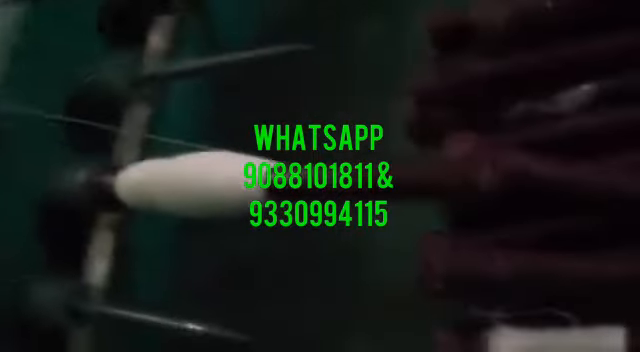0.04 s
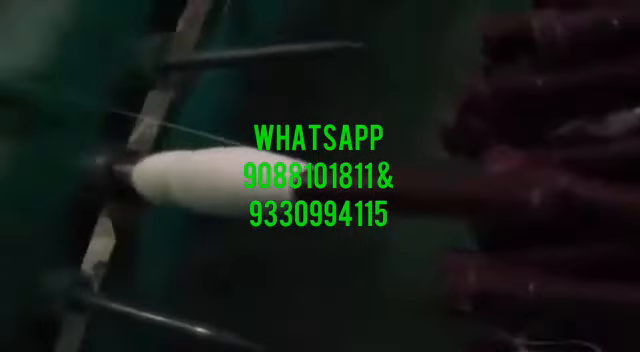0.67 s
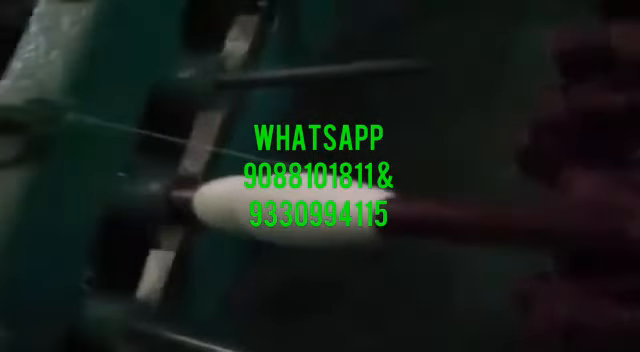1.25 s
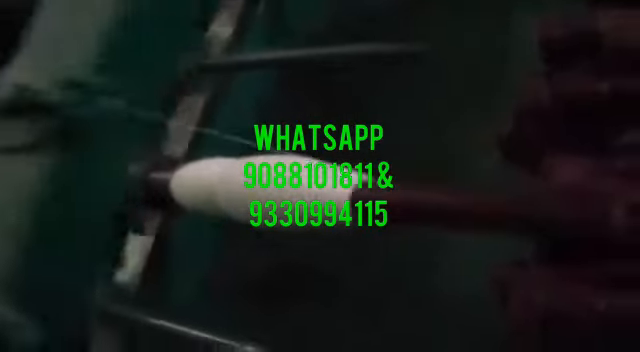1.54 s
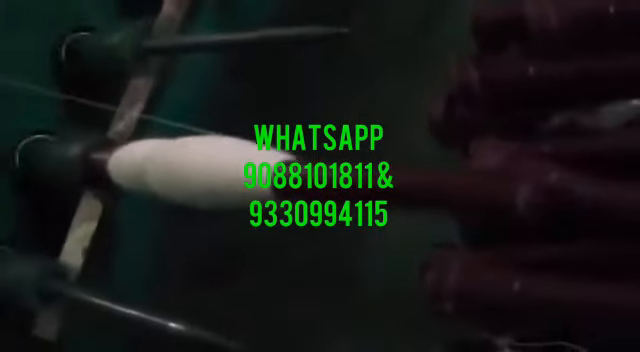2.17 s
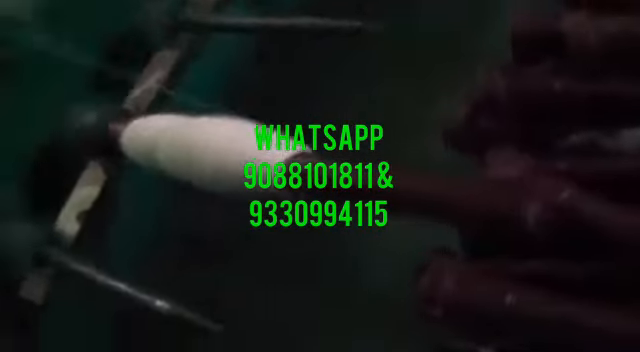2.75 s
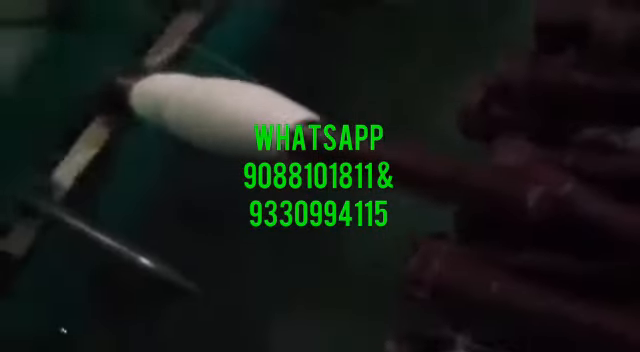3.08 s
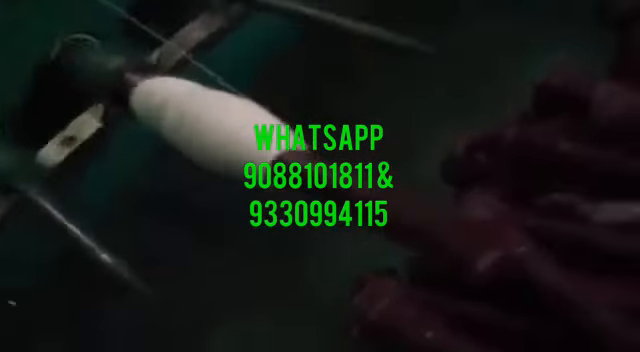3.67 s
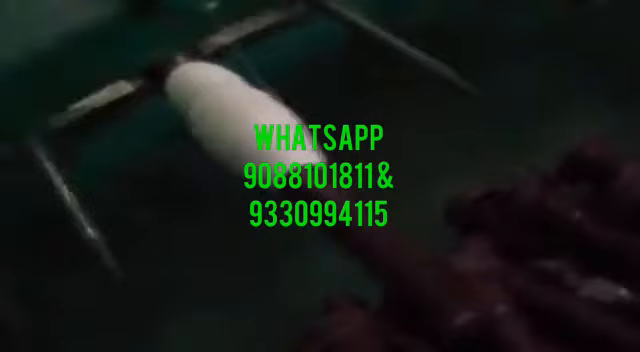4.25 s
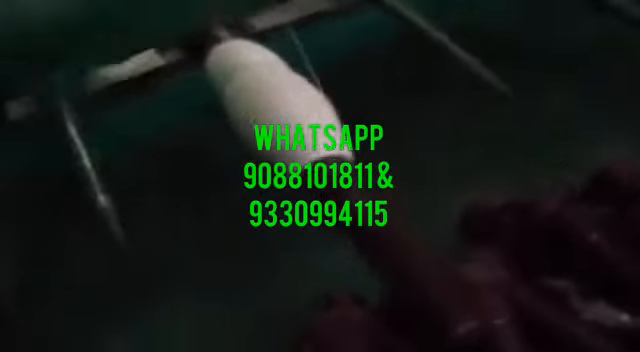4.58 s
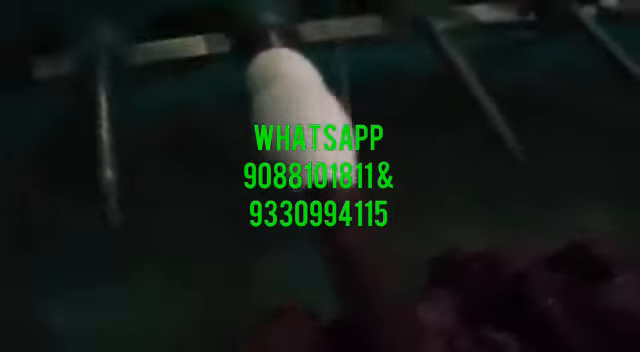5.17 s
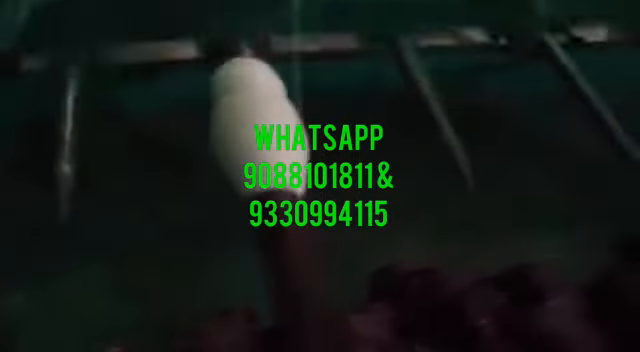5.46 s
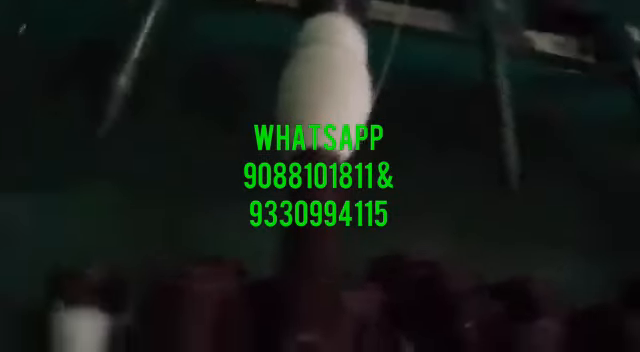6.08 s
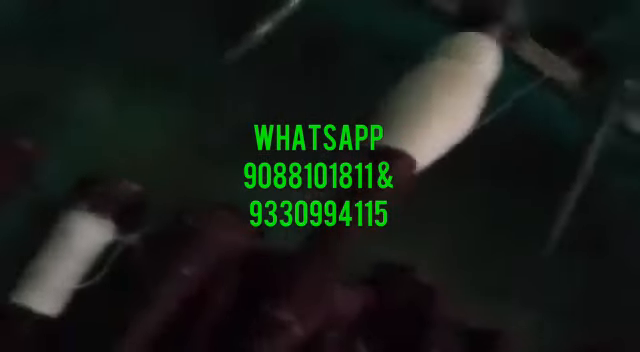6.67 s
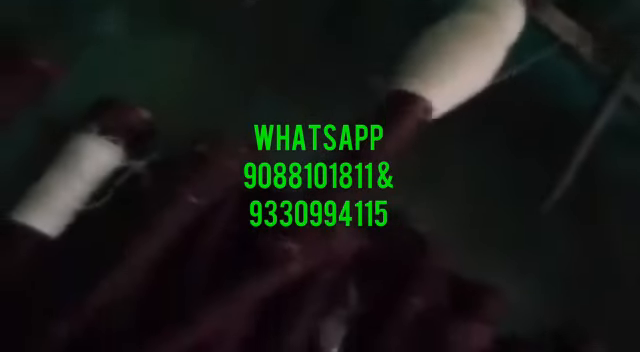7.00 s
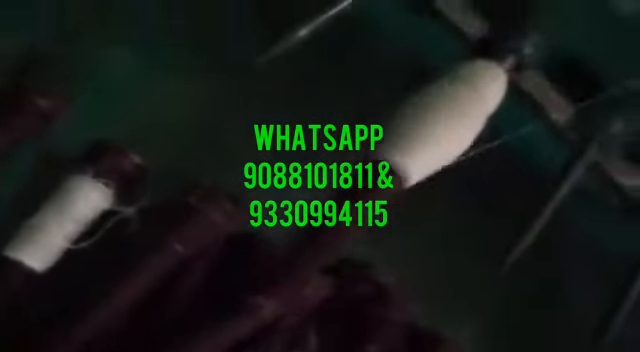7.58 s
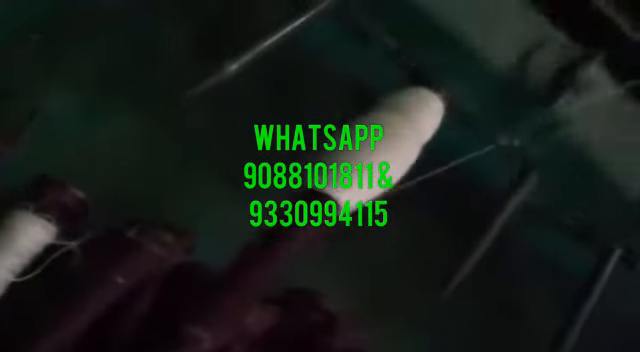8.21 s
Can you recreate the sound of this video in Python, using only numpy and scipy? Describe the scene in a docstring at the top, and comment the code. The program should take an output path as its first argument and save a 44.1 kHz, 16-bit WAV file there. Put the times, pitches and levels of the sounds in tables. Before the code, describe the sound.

Steady factory machine noise of belts, gears and loose spindles, marked by regular sharp metal clacks and a few faint squeaks.

```python
"""A bobbin winder runs close by: from the start, belts and gears roar, its frame rumbles and
loose spindles rattle and knock. Soon the yarn guide rail clacks against a stop, then shuttles to
and fro, clacking at each end. After most clacks the whole din ducks briefly, as under a limiter,
then recovers and builds through the stroke. Now and then a dry guide squeaks or the drive grinds
louder for a moment. The hardest clack comes just before the end."""
import sys
import numpy as np
from scipy import signal
from scipy.fft import rfft, irfft, next_fast_len
from scipy.io import wavfile
from scipy.ndimage import uniform_filter1d, minimum_filter1d

SR = 44100
rng = np.random.default_rng(int(sys.argv[2]) if len(sys.argv) > 2 else 0)


def waveform_to_disk(signal):
    """Save audio, clipped to [-1, 1], as 16-bit WAV at the path in sys.argv[1]."""
    frames = np.transpose(np.atleast_2d(signal))
    scaled = np.clip(frames, -1, 1) * 32767
    samples = np.round(scaled).astype(np.int16)
    wavfile.write(sys.argv[1], SR, samples)


N = 367794
TIME = np.arange(N) / SR

# tone of the belts and gears (frequency [Hz], relative level [dB])
ROAR_TONE = [(65, -32), (110, -2.5), (140, -8.5), (231, -5), (326, -6), (504, -5.5), (665, -1.5), (964, 1),
             (1180, 0), (2000, -7.5), (2600, -17), (3380, -36), (5720, -120)]
# low notes the frame rings at (frequency [Hz], width [Hz], relative level [dB])
FRAME_NOTES = [(20.8, 3.1, -3), (27, 3.7, -5), (37, 2.4, -8), (48.9, 6, 5), (71.5, 1, -0.5),
               (79.4, 2.1, -3.5), (97.7, 5.6, -1), (107, 12, -6.5), (123.5, 15, -3.5), (165.4, 2.1, -7),
               (182, 7.7, -18.5), (228.7, 2.7, -15.5), (274.8, 3.2, -13)]
# the frame's rumble before ducking and surges (time [s], level [dB])
RUMBLE_LEVELS = [(0, -24), (.4, -30.5), (.78, -26), (1.0, -26.5), (1.6, -31), (2.0, -25.5), (2.5, -29.5),
                 (2.85, -26), (3.1, -28.5), (4.4, -30), (5.35, -27.5), (5.6, -23.5), (6.05, -34.5),
                 (6.35, -24), (6.9, -31), (7.4, -27.5), (8.34, -27.5)]
# tone of the spindles' rattle (frequency [Hz], relative level [dB])
RATTLE_TONE = [(700, -43), (1300, 4.5), (1900, 4), (2300, 0), (2600, -4), (3600, 0), (4000, -7.5),
               (4500, -6), (5100, -6), (5600, -17)]
# notes the spindles and guides ring at (frequency [Hz], width [Hz], relative level [dB])
SPINDLE_NOTES = [(710, 90, -7.5), (952, 72, -2.5), (1020, 39, -8.5), (1244, 63, 0.5), (1478, 12, -3.5),
                 (1646, 130, -9.5), (2240, 220, -5.5), (3036, 11, -13.5), (3480, 18, -16.5), (3650, 25, -5),
                 (4850, 280, -8), (5050, 98, -21)]
# loose parts knock (time [s], relative level [dB])
LOOSE_KNOCKS = [(0.079, -14), (0.152, -14.5), (0.517, -13.5), (1.390, -13.5), (1.459, -12.5),
                (1.548, -15.5), (2.257, -18.5), (2.415, -13), (2.430, -12.5), (2.834, -17.5), (3.28, -18.5),
                (3.337, -13), (3.519, -16.5), (3.577, -11.5), (3.759, -17.5), (4.013, -11.5),
                (4.176, -15.5), (4.206, -16), (4.446, -14), (4.468, -15), (4.864, -19.5), (4.896, -13),
                (5.132, -14.5), (5.771, -12), (5.957, -12), (6.212, -13), (6.633, -15), (6.776, -20),
                (6.864, -16.5), (6.922, -15.5), (7.432, -15.5), (7.497, -14), (7.821, -11), (8.252, -20.5),
                (8.319, -12)]
# the rail hits the near or the far stop; a duck below zero is a lift (time [s], relative level [dB],
# chatter length [s], buzz against the blow [dB], duck that follows [dB], next stroke's offset [dB])
NEAR_HITS = [(.401, -8, .008, -14.5, 3.5, 0.1), (1.319, 1.5, 0.0068, -18, 2.5, 0),
             (2.226, -6.5, .008, -9, 3.2, -0.5), (3.135, 2, 0.0039, -17.5, 2.5, -2),
             (4.029, -8.5, 0.0072, -9.5, 0.4, -2.7), (4.930, -8.5, 0.0078, -20, 6.5, 1.2),
             (5.821, -8, .0044, -12.5, 0.8, -2), (6.727, -6, 0.0039, -17.5, -0.3, -1),
             (7.629, -8, 0.0025, -17.5, 4.5, 0.5)]
FAR_HITS = [(.858, -4.5, .004, -24.5, 5.5, 0.6), (1.778, 4, 0.0023, -26, 2.5, 0),
            (2.684, -3, .004, -15.5, -0.9, .2), (3.589, -9, 0.0096, -24.5, 5.5, 0.45),
            (4.480, -7.5, .0055, -23.5, 4.5, 1.1), (5.387, -6, .0086, -31, 3, 1),
            (6.287, 3.5, 0.0018, -24.5, 4, 1.3), (7.191, 3, 0.0025, -18, -3, -0.5),
            (8.097, 10.5, 0.0021, -26, -1.5, 0.9)]
# tone of the crack of each hit (frequency [Hz], relative level [dB])
CRACK_TONE = [(200, -15.5), (800, -4), (1500, 2.5), (2300, 7.5), (3500, 5), (4000, -3.5), (5000, -1),
              (5800, -9.5)]
# notes each stop rings at (frequency [Hz], width [Hz], relative level [dB])
NEAR_NOTES = [(594, 92, -15), (1540, 170, -2.5), (1922, 65, -7.5), (2082, 92, -5.5), (2516, 160, -8)]
FAR_NOTES = [(1542, 38, -13.5), (2180, 130, -10), (2900, 270, -9.5), (3470, 130, -18)]
# dry guides squeak (middle time [s], length [s], pitch [Hz], level [dB])
GUIDE_SQUEAKS = [(0.78, 0.13, 3300, -31), (1.12, 0.034, 3070, -21), (2.935, 0.062, 3100, -26.5),
                 (3.06, 0.049, 3130, -22.5), (4.404, 0.081, 3300, -23), (8.08, .07, 3270, -20)]
# the drive grinds louder for a moment (middle time [s], length [s], rise of the roar [dB])
DRIVE_SURGES = [(1.07, .04, 2.5), (1.246, 0.049, 3), (2.418, 0.033, 4), (3.324, 0.05, 3),
                (3.854, 0.11, 3.5), (4.164, .04, 4.5), (4.406, 0.11, 4.5), (4.689, 0.032, 0),
                (5.304, 0.11, 0.5), (5.664, 0.044, 3), (5.763, .04, 2.5), (6.216, 0.034, 4),
                (7.164, 0.066, 3), (7.404, 0.056, 4), (7.484, .04, 7.5), (7.826, 0.02, -0.5),
                (7.967, 0.034, 4)]


def from_db(db):
    """Turn decibels into a number to multiply by."""
    return 10 ** (np.asarray(db) / 20)


def unit_power(x):
    """Scale a signal to an average power of 1."""
    return x / np.sqrt(np.mean(x ** 2) + 1e-20)


def drift(per_s):
    """A random wander of typical size 1, heading for a new value per_s times a second."""
    turns = np.arange(0, TIME[-1] + 1, 1 / per_s)
    return unit_power(np.interp(TIME, turns, rng.standard_normal(N)[:len(turns)]))


def swell(middle, length):
    """A smooth rise and fall of height 1."""
    return np.exp(-(2 * (TIME - middle) / length) ** 2)


def colour(x, tone):
    """Filter a sound to the given tone; white noise keeps its power."""
    size = next_fast_len(N + SR // 10) * 2
    hz, db = np.transpose(tone)
    bin_hz = np.arange(size // 2 + 1) * SR / size
    gain = unit_power(from_db(np.interp(np.log(bin_hz + 1), np.log(hz), db, left=-60, right=-60)))
    # keep one half and double it, so the filter never sounds ahead of a blow
    cepstrum = irfft(np.log(gain))[:size // 2]
    cepstrum[1:] *= 2
    return irfft(rfft(x, size) * np.exp(rfft(cepstrum, size)))[:N]


def resonate(x, notes):
    """A shaken part rings at several notes at once; narrower notes ring longer."""
    out = 0
    for k, (hz, width_hz, db) in enumerate(notes):
        decay = np.exp(-np.pi * width_hz / SR)
        poles = [1, -2 * decay * np.cos(2 * np.pi * hz / SR), decay ** 2]
        gain = (-1) ** k * from_db(db) * np.sqrt((1 - decay ** 2) / 2)
        out = out + gain * signal.lfilter([1, 0, -1], poles, x + 1e-18)
    return out


def roar(level_db, flutter_db):
    """Belts and gears across the workshop merge into a fluttering roar."""
    return from_db(level_db + flutter_db * drift(60)) * colour(rng.standard_normal(N), ROAR_TONE)


def frame(level_db):
    """The turning shafts shake the frame, which rumbles at its low notes."""
    return from_db(level_db) * unit_power(resonate(rng.standard_normal(N), FRAME_NOTES))


def spindles(level_db, taps_per_s, spread_db, tap_s, whirr, ring_db, swell_db):
    """Loose spindles tap densely in their bearings over a steady whirr; at times one knocks harder."""
    is_tap = rng.random(N) < taps_per_s / SR
    taps = is_tap * from_db(spread_db * np.clip(rng.standard_normal(N), -2, 2))
    energy = signal.lfilter([1], [1, -np.exp(-2 / (tap_s * SR))], taps ** 2 + 1e-18)  # each tap fades
    loudness = np.sqrt(energy / energy.mean() + whirr)
    force = from_db(level_db) * unit_power(loudness * rng.standard_normal(N))
    knocks = sum(contact(s, db, .002, fade_s=.004, buzz_db=-12, buzz_s=.02) for s, db in LOOSE_KNOCKS)
    force += knocks.sum(axis=0)
    # each spindle rings up and falls quiet again in its own time
    rings = sum(resonate(force * from_db(swell_db * drift(12)), [note]) for note in SPINDLE_NOTES)
    return colour(force, RATTLE_TONE) + from_db(ring_db) * rings


def contact(start, db, chatter_s, fade_s, buzz_db, buzz_s):
    """Steel chatters on steel for a few milliseconds; returns the blow and its lingering buzz."""
    out, first = np.zeros((2, N)), int(start * SR)
    age = TIME[:min(SR // 4, N - first)]
    blow = np.exp(-np.maximum(age - chatter_s, 0) / fade_s)
    buzz = from_db(buzz_db) * np.exp(-age / buzz_s)
    shapes = np.array([blow, buzz])
    out[:, first:first + len(age)] = from_db(db) * shapes * rng.standard_normal(shapes.shape)
    return out


def rail_stop(hits, notes, crack_db, ring_db, hiss_db):
    """The rail hits a stop with a crack, then buzzes on at that stop's notes."""
    blow, buzz = sum(contact(s, db, chatter_s, fade_s=.002, buzz_db=buzz_db, buzz_s=.07)
                     for s, db, chatter_s, buzz_db, *_ in hits)
    crack = colour(blow + from_db(hiss_db) * buzz, CRACK_TONE)
    ring = resonate(blow + buzz, notes)
    return from_db(crack_db) * crack + from_db(ring_db) * ring


def strokes(duck_s, recover_s, climb_db_per_s):
    """After most hits the din ducks and swells back, as under a recorder's gain control."""
    duck_db, build_db, coasting = np.zeros((3, N))
    for s, *_, depth_db, offset_db in sorted(NEAR_HITS + FAR_HITS, key=lambda hit: hit[0]):
        first = int(s * SR)
        age = TIME[:N - first]
        duck_db[first:] = -depth_db * np.clip(1 - (age - duck_s) / recover_s, 0, 1)
        build_db[first:] = offset_db + climb_db_per_s * np.maximum(age - duck_s - recover_s, 0)
        coasting += swell(middle=s + .325, length=.14)  # 0 to 1, late in the stroke
    return uniform_filter1d([duck_db, build_db, coasting], size=SR // 50)


def squeaks(waver_hz):
    """A dry guide sings briefly on one slightly unsteady note."""
    waver = np.cumsum(waver_hz * drift(170)) / SR
    return sum(from_db(db) * swell(s, length) * np.sin(2 * np.pi * (hz * TIME + waver))
               for s, length, hz, db in GUIDE_SQUEAKS)


def surges(dip_share, wander_db):
    """Level change in dB: the drive grinds louder, then the level dips, over a slight wander."""
    change_db = wander_db * drift(35)
    for s, length, db in DRIVE_SURGES:
        dip = swell(middle=s + length / 2 + .06, length=.092)
        change_db += db * (swell(s, length) - dip_share * dip)
    return change_db


def scene():
    """The winder and workshop in mono; roar, rattle and rumble each follow the strokes and surges."""
    duck_db, build_db, coasting = strokes(duck_s=.089, recover_s=.096, climb_db_per_s=5)
    surge_db = surges(dip_share=.4, wander_db=.85)
    roar_db = -22 + .92 * duck_db + .9 * build_db + .1 * coasting + surge_db
    rumble_db = np.interp(TIME, *np.transpose(RUMBLE_LEVELS)) + .83 * duck_db + .5 * surge_db
    # the spindles settle while the rail coasts
    rattle_db = -21 + .55 * duck_db + .8 * build_db - 2.5 * coasting + .6 * surge_db
    rattle = spindles(rattle_db, taps_per_s=160, spread_db=3.5, tap_s=.017,
                      whirr=.8, ring_db=-11, swell_db=2.5)
    rumble = frame(rumble_db)
    near = rail_stop(NEAR_HITS, NEAR_NOTES, crack_db=-2.5, ring_db=1, hiss_db=.5)
    far = rail_stop(FAR_HITS, FAR_NOTES, crack_db=-.5, ring_db=-3, hiss_db=1)
    return (roar(roar_db, flutter_db=1.07) + rumble + rattle + near + far + squeaks(waver_hz=28))[None]


def limiter(x, threshold_db, share, release_db_per_s):
    """A loud peak turns the volume down at once by a share of its excess; the volume then creeps back."""
    peak_db = 20 * np.log10(np.abs(x).max(axis=0) + 1e-9)
    cut_db = share * np.maximum(peak_db - threshold_db, 0)
    release_db = release_db_per_s * TIME
    held_db = np.maximum.accumulate(cut_db + release_db) - release_db
    return x * from_db(uniform_filter1d(minimum_filter1d(-held_db, size=45), size=45))


def overload(x, threshold_db, range_db):
    """How hard the input is overdriven, from 0 to 1, over a few milliseconds."""
    level_db = 10 * np.log10(np.abs(uniform_filter1d(x ** 2, size=SR // 120)) + 1e-12)
    return np.clip((level_db - threshold_db) / range_db, 0, 1)


def record(dry):
    """Peaks are limited and rounded off and the treble is cut; the hardest clacks still spit treble."""
    limited = limiter(dry, threshold_db=-2, share=.34, release_db_per_s=53)
    squashed = limited / (1 + (limited / .66) ** 4) ** (1 / 4)
    dulled = signal.sosfilt(signal.butter(9, 5520, fs=SR, output="sos"), squashed)
    treble_cut = signal.firwin(241, cutoff=6170, window=("kaiser", 8), fs=SR)
    narrow = signal.fftconvolve(np.clip(dulled, -.75, .75), treble_cut[None], "same")
    treble = signal.sosfilt(signal.butter(2, (6500, 9800), "band", fs=SR, output="sos"), squashed)
    spit = from_db(-15) * overload(dry, threshold_db=-2.5, range_db=1.5) * treble
    top_cut = signal.ellip(10, .2, 80, 16000, fs=SR, output="sos")  # removes sound above 16000 Hz
    return signal.sosfilt(top_cut, narrow + spit)


dry = scene()
out = record(dry)
waveform_to_disk(out)
```